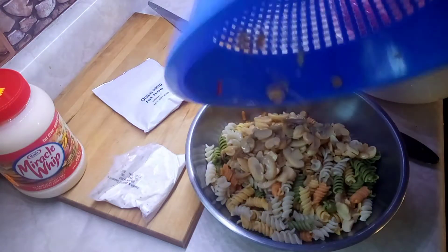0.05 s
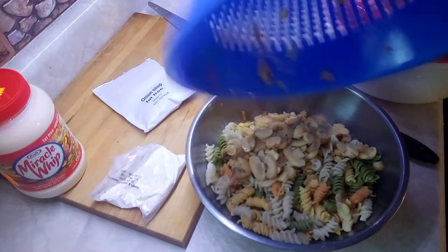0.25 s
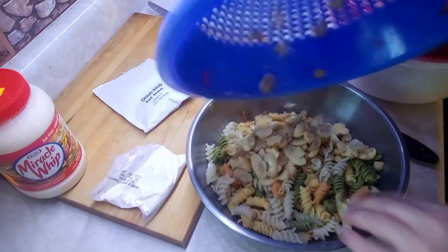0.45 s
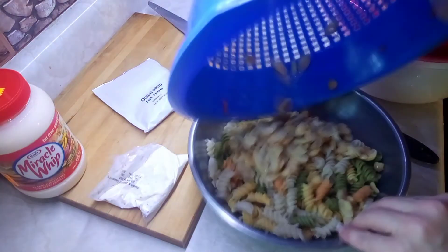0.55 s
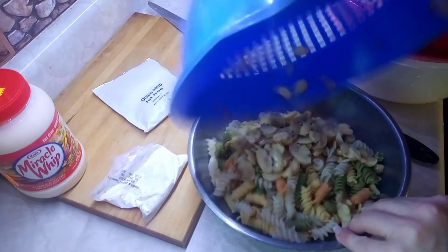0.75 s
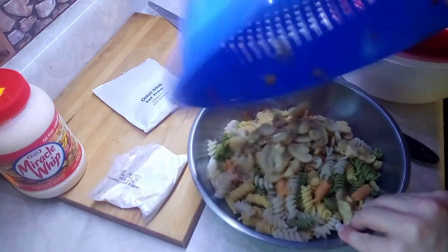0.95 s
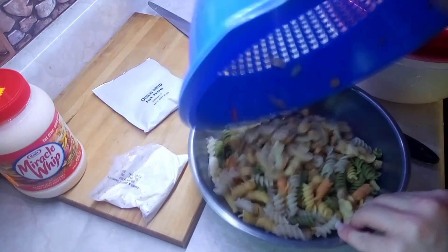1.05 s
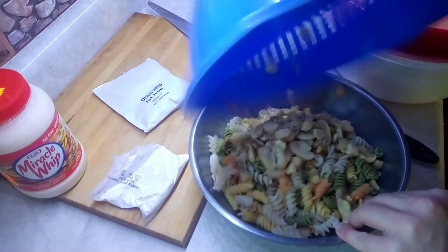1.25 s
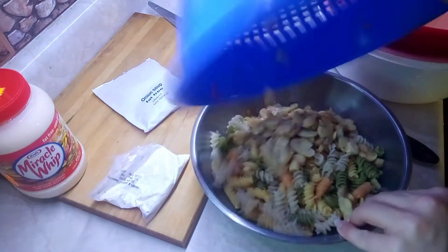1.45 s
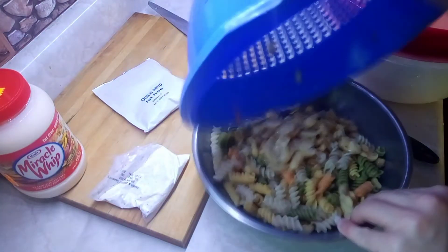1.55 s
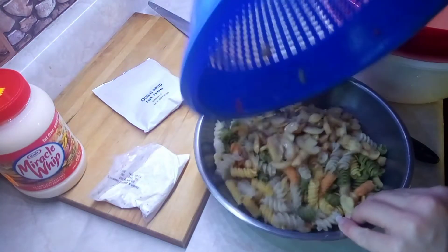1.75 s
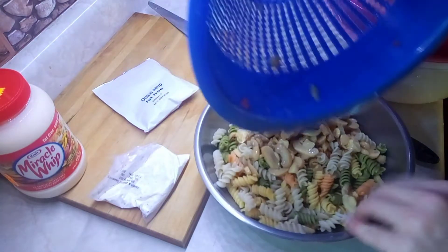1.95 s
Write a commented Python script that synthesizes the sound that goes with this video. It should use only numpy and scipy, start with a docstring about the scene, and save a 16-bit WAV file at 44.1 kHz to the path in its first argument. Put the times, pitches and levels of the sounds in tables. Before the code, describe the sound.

A plastic strainer knocks on the rim of a filled steel bowl, close by in a kitchen. From about 0.3 seconds, ten bright clacks come evenly, six a second, each followed by a dull, hollow rebound thud. They grow louder over the first second and continue until about 1.9 seconds. The bowl rings faintly, more damped after 0.6 seconds. A soft hiss lies underneath.

```python
"""A strainer knocked on a steel bowl

A plastic strainer is knocked on the rim of a steel bowl of pasta, six times a second, in a kitchen.
Each impact excites damped modes, a bright clack; a dull thud follows as the shaken strainer rebounds.
The bowl rings on faintly until a hand steadies it; a soft hiss lies under everything."""
import sys
import numpy as np
from scipy import signal
from scipy.io import wavfile

SR = 44100
rng = np.random.default_rng(int(sys.argv[2]) if len(sys.argv) > 2 else 0)


def generate_wav(signal):
    """Clip the signal to [-1, 1] and save it as 16-bit WAV at the path in sys.argv[1]."""
    frames = np.transpose(np.atleast_2d(signal))
    scaled = np.clip(frames, -1, 1) * 32767
    pcm = np.round(scaled).astype(np.int16)
    wavfile.write(sys.argv[1], SR, pcm)


N = 88288

# Strainer meets rim. Each row: start in seconds, level in dB, bass gain in dB, treble gain in dB,
# favoured clack frequency in Hz, bright clack gain in dB, long ring gain in dB.
KNOCKS = [(-.1, 6, -5, 9.5, 4000, -4, -14), (0.2719, -8.5, 0, -27, 4900, 2, 2.5),
          (0.4447, -4, -6, -3, 4900, 2.5, 2.5), (0.6246, -2, 1, -6, 4460, 3, 0.5),
          (0.8014, -1, -0.5, -2, 3950, 1.5, -5), (0.9648, -1.5, 0.5, -7.5, 3950, -1, -8),
          (1.1278, -0.5, -0.5, 0, 3950, -1, -12), (1.28, -0.5, 3, 5.5, 4250, -2.5, -4),
          (1.2916, -4.5, 5.5, -19, 3320, -24, -13), (1.461, 1, 0.5, -1, 4000, -1, -3),
          (1.6206, -0.5, 2.5, 6, 4250, -2.5, -16), (1.7865, 0, 1.5, -7.5, 4300, -2, -5)]
# Rebounds. Each row: start in seconds, level in dB, bass gain in dB, tick gain in dB, tick treble in dB.
THUDS = [(-.022, -19.5, 9.5, -23, 0), (.3111, -8.5, 1.5, -3, -9), (0.497, -2, -2.5, -0.5, -20),
         (0.7112, -15.5, 5.5, -2, -10), (0.8471, 1.5, -3.5, -2.5, 1.5), (1.0134, -1, -0.5, 1, -6),
         (1.1754, -0.5, 0, -2, -2), (1.3364, 2.5, -9, -5, 4), (1.527, -15, 9, -4, 0),
         (1.679, 1, 1, -0.5, 6.5), (1.8559, 4, -4.5, -3, 4.5)]
# Light touches. Each row: start in seconds, level in dB, treble gain in dB, 60 dB decay time in seconds.
RATTLES = [(1.3285, -33.5, 2, 0.071), (1.5175, -36, -4, 0.042), (1.66, -43, 8, 0.055),
           (1.8155, -40, 14, 0.018)]
# Long-lived modes of the free bowl. Each row: frequency in Hz, level in dB.
BOWL_MODES = [(1297, -54.5), (1748, -56), (2019, -61.5), (2106, -46), (2337, -44), (2364, -58.5),
              (2605, -40), (3030, -49.5), (3558, -52.5), (4091, -50), (4242, -61)]

# Damped modes. Each row: frequency in Hz, level in dB, 60 dB decay time in seconds.
KNOCK_MODES = [(143, -35.5, 0.24), (242.7, -34, 0.19), (339.7, -27.5, 0.21), (528.3, -32, 0.12),
               (786.5, -32.5, 0.12), (1100, -35, 0.11), (1391, -29.5, 0.077), (1518, -25.5, 0.031),
               (1704, -35.5, 0.14), (1770, -40, 0.12), (2286, -43.5, 0.043)]  # strainer and filled bowl
BRIGHT_MODES = [(2602, -25, 0.036), (3131, -23, 0.067), (3402, -31.5, 0.036), (3893, -20.5, 0.018),
                (3983, -30, 0.084), (4143, -28.5, 0.038), (4260, -23, 0.015), (4730, -37.5, .09),
                (4804, -34, 0.12), (4926, -26, 0.028), (5490, -33.5, 0.017), (5690, -38, 0.086),
                (6510, -42, 0.022), (6955, -41.5, 0.084)]  # bright clack of plastic on the rim; the shortest make its crack
SWAY_MODES = [(92.5, -27, .14), (105, -24, 0.14)]  # loaded bowl swaying on its board
THUD_MODES = [(150, -32.5, 0.28), (191.8, -32.5, 0.23), (216.8, -33, 0.28), (288, -35, 0.21),
              (322.3, -23, 0.11), (435.3, -34, 0.19), (583.6, -75, 0.11), (740.2, -32, 0.12),
              (912, -29.5, 0.07)]  # hollow ring of the rebound

# Dense modes. Each row: frequency in Hz, octave-band level in dB, 60 dB decay time in seconds.
CLACK_BODY = [(50, -71, .1), (111, -52.5, 0.058), (250, -37.5, 0.33), (514, -39.5, 0.091),
              (780, -23.5, 0.056), (1410, -21, 0.025), (2640, -23, 0.07), (4070, -24.5, 0.058),
              (5860, -28.5, 0.038), (8900, -30.5, 0.047), (15400, -29.5, 0.091)]  # the plastic
THUD_BODY = [(50.3, -65.5, 0.09), (112.6, -31.5, 0.24), (205, -27, 0.067), (430, -30, 0.088),
             (740, -21.5, 0.064), (1146, -32.5, 0.044), (1700, -43, 0.067), (3000, -58.5, .05),
             (16000, -105, .05)]  # the rebound
KNOCK_ROOM = [(48, -82, 0.16), (152.5, -27, 0.23), (370, -38, 0.18), (1030, -41, 0.27), (1960, -36.5, 0.23),
              (4320, -35, 0.28), (6500, -50, 0.2), (10750, -50, 0.37), (16000, -64, .16)]  # the kitchen after a knock
THUD_ROOM = [(50, -70, .4), (145, -60.5, 0.9), (324, -26.5, 0.17), (670, -37, 0.3), (1350, -48, 0.23),
             (4000, -60, 0.61), (16100, -86, .2)]  # the kitchen after a rebound
# Steady background. Each row: frequency in Hz, octave-band level in dB.
HISS_SPECTRUM = [(25, -82), (60, -73.5), (140, -73), (400, -91), (1000, -76.5), (1800, -73.5), (3000, -66),
                 (4800, -59), (6500, -81.5), (9000, -86.5), (16000, -71)]

AGE = np.arange(int(.6 * SR)) / SR  # seconds since a blow
THIRD_OCTAVES_HZ = 31.25 * 2 ** (np.arange(28) / 3)
CLACK_ATTACK_S, THUD_ATTACK_S, ROOM_ATTACK_S, BUILD_CYCLES = 0.001, 0.0018, 0.0063, 2.2
REPEATED_SHARE = 0.92  # share of the dense ringing's power that is alike from blow to blow
BASS_HZ, TREBLE_HZ = 457, 8200
FOCUS_DB, FOCUS_WIDTH_OCT = 5.5, 0.11
PUSH_DB, PUSH_HZ, PUSH_CYCLES = -14, 605, 0.33
TICK_DB, TICK_LEAD_S, TICK_T60_S, TICK_HZ = -32.5, 0.001693, 0.064, 3100
FREE_T60_S, HELD_AT_S, HAND_T60_S = 1.0, .63, 0.55


def knocks():
    """Impact excitation: hard plastic on steel sets strainer, bowl and room vibrating at once."""
    out, count = np.zeros(N), len(KNOCKS)
    dense = dense_ring(CLACK_BODY, CLACK_ATTACK_S, count) + dense_ring(KNOCK_ROOM, ROOM_ATTACK_S, count)
    for (s, db, bass_db, treble_db, favoured_hz, bright_db, _), clack in zip(KNOCKS, dense):
        body = bass_shelf(clack + modes(KNOCK_MODES, spread_db=3.0), bass_db)
        sway = modes(SWAY_MODES, spread_db=2.8)
        bright = from_db(bright_db) * bright_clack(favoured_hz)
        add(out, s, from_db(db) * treble_shelf(body + sway + bright, treble_db))
    return out


def bright_clack(favoured_hz):
    """Selective excitation: the point of contact favours the clack's modes near one frequency."""
    hz, db, t60 = np.transpose(BRIGHT_MODES)
    boost_db = FOCUS_DB * np.exp(-(np.log2(hz / favoured_hz) / FOCUS_WIDTH_OCT) ** 2)
    return modes(zip(hz, db + boost_db, t60), spread_db=2.0)


def thuds():
    """Soft impact: after a light tick, the rebound gives one broad push and rings mainly in low modes."""
    out, count = np.zeros(N), len(THUDS)
    dense = dense_ring(THUD_BODY, THUD_ATTACK_S, count) + dense_ring(THUD_ROOM, ROOM_ATTACK_S, count)
    cycles = AGE * PUSH_HZ - 2  # the pulse peaks two cycles in
    push = -from_db(PUSH_DB) * np.cos(2 * np.pi * cycles) * np.exp(-.5 * (cycles / PUSH_CYCLES) ** 2)
    for (s, db, bass_db, tick_db, treble_db), body in zip(THUDS, dense):
        add(out, s - TICK_LEAD_S, tick(db + TICK_DB + tick_db, treble_db, TICK_T60_S))
        add(out, s - 2 / PUSH_HZ, from_db(db) * push)
        add(out, s, from_db(db) * bass_shelf(body + modes(THUD_MODES, spread_db=0.95), bass_db))
    return out


def bowl_ring():
    """Free vibration: the bowl rings after each knock; once held, the hand's damping adds to its own."""
    out, t = np.zeros(N), np.arange(N) / SR
    for s, db, *_, ring_db in KNOCKS:
        age = np.maximum(t - s, 0)
        held = np.maximum(t - max(s, HELD_AT_S), 0)
        ring = sum(from_db(mode_db) * np.sin(2 * np.pi * (hz * age + rng.random()))
                   for hz, mode_db in BOWL_MODES)
        loss_db = 60 * (age / FREE_T60_S + held / HAND_T60_S)
        out += (t > s) * ring * from_db(db + ring_db - loss_db)
    return out


def tick(db, treble_db, t60):
    """Brief contact has a broad spectrum: a light touch of plastic is a decaying burst of noise."""
    noise = filtered(rng.standard_normal(len(AGE)), TICK_HZ, "low", order=1)
    return treble_shelf(from_db(db - 60 * AGE / t60) * noise / noise.std(), treble_db)


def modes(table, spread_db):
    """Modal superposition: damped sines of alternating sign, their levels varying from blow to blow."""
    out = 0
    for k, (hz, db, t60) in enumerate(table):
        decay = from_db(db + spread_db * rng.normal() - 60 * AGE / t60)
        build_up = 1 - np.exp(-AGE * hz / BUILD_CYCLES)
        out += (-1) ** k * decay * build_up * np.sin(2 * np.pi * hz * AGE)
    return out


def dense_ring(table, attack_s, count):
    """Modal overlap: countless close modes merge into noise that dies band by band; one row per blow."""
    out = 0
    for hz, noise, (t60,) in noise_bands(table, count + 1, len(AGE)):
        envelope = (1 - np.exp(-AGE / (attack_s + .5 / hz))) * from_db(-60 * AGE / t60)
        ring = (np.sqrt(REPEATED_SHARE) * noise[0] + np.sqrt(1 - REPEATED_SHARE) * noise[1:]) * envelope
        energy = np.sum(ring ** 2, axis=1, keepdims=True)
        out += ring * noise.std() * np.sqrt(np.sum(envelope ** 2) / energy)  # equal energy in each row
    return out


def bass_shelf(x, bass_db):
    """Shelving of the lows: each blow has its own amount of bass."""
    return x + (from_db(bass_db) - 1) * filtered(x, BASS_HZ, "low", order=1)


def treble_shelf(x, treble_db):
    """Shelving of the highs: a harder contact has more of the highest treble."""
    low, high = [filtered(filtered(x, TREBLE_HZ, kind), TREBLE_HZ, kind) for kind in ("low", "high")]
    return low + from_db(treble_db) * high


def hiss():
    """Stationary noise: bands of constant level sum to a soft background."""
    return sum(noise[0] for _, noise, _ in noise_bands(HISS_SPECTRUM, count=1, size=N))


def noise_bands(table, count, size):
    """Spectral shaping: yields each third octave's centre, noise (count x size) and further columns."""
    hz, *columns = np.transpose(table)
    white = rng.standard_normal((2, count, size + SR // 5))  # adjacent bands use independent noise
    for k, centre in enumerate(THIRD_OCTAVES_HZ):
        db, *rest = [np.interp(np.log(centre), np.log(hz), column) for column in columns]
        edges_hz = [centre / 2 ** (1 / 6), centre * 2 ** (1 / 6)]
        noise = filtered(white[k % 2], edges_hz, "band", order=3)[:, -size:]
        yield centre, noise / noise.std() * from_db(db) / np.sqrt(3), rest  # a third of an octave's power


def from_db(db):
    """Logarithmic level: 20 dB is a factor of ten in amplitude."""
    return 10 ** (np.asarray(db) / 20)


def filtered(x, hz, kind, order=2):
    """Filtering with a maximally flat passband."""
    return signal.sosfilt(signal.butter(order, hz, kind, fs=SR, output="sos"), x)


def add(out, s, sound):
    """Linear superposition: a sound joins the mix at s seconds."""
    i = int(round(s * SR))
    part = sound[max(-i, 0):max(N - i, 0)]
    out[max(i, 0):max(i, 0) + len(part)] += part


def scene():
    """Mid-side stereo: all sources sit in the middle; a delayed copy spreads the highest treble."""
    mid = knocks() + thuds() + bowl_ring() + hiss()
    for s, db, treble_db, t60 in RATTLES:
        add(mid, s, tick(db, treble_db, t60))
    side = np.zeros(N)
    add(side, s=.0023, sound=from_db(-14.5) * filtered(mid, hz=7640, kind="high", order=6))
    return np.array([mid + side, mid - side])


def record(dry):
    """Band limiting: rumble is cut, treble drops to a shelf with a faint aliasing-like band near 15 kHz."""
    passband = filtered(dry, hz=7045, kind="low", order=12)
    shelf = from_db(-24.5) * dry
    top_band = from_db(-19.5) * filtered(dry, hz=[14500, 15900], kind="band")
    heard = filtered(passband + shelf + top_band, hz=44, kind="high")
    return signal.sosfilt(signal.ellip(10, .5, 70, 16100, fs=SR, output="sos"), heard)  # 16.1 kHz limit


dry = scene()
out = record(dry)
generate_wav(out)
```